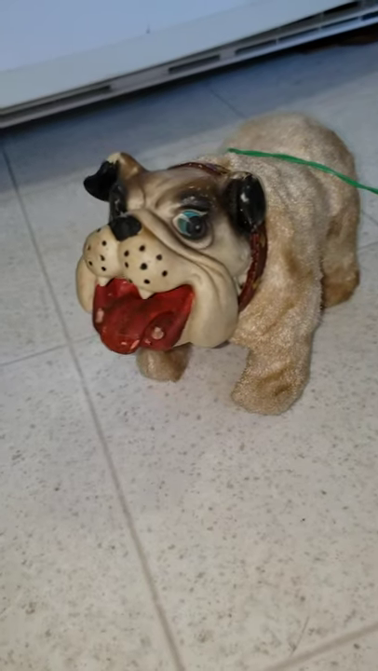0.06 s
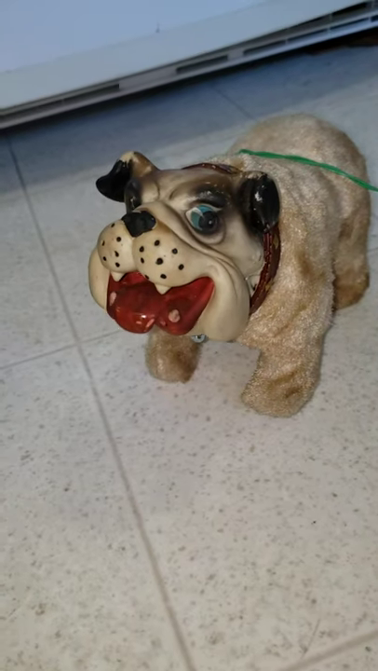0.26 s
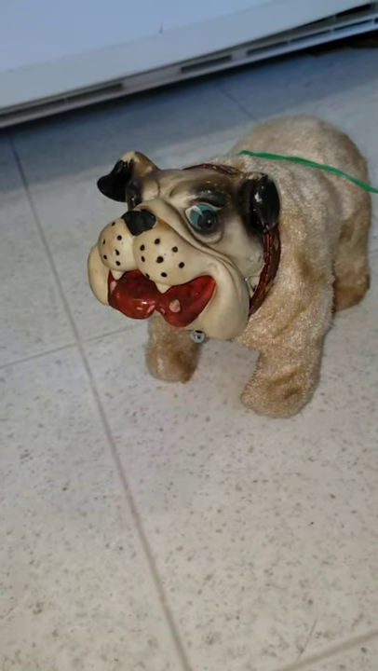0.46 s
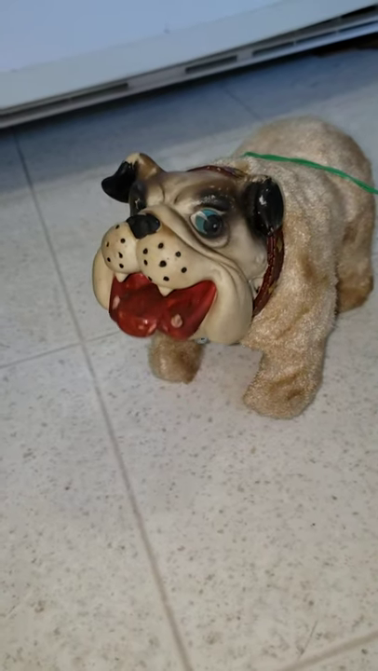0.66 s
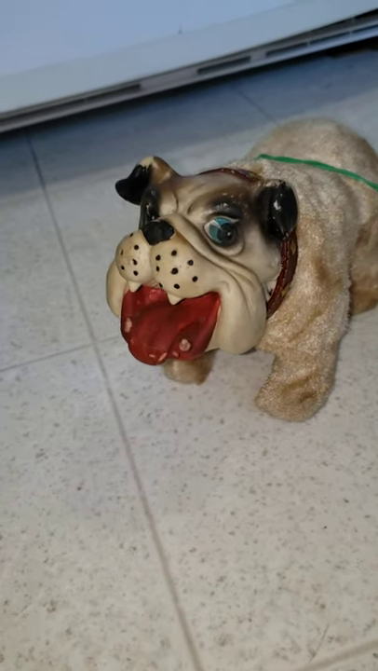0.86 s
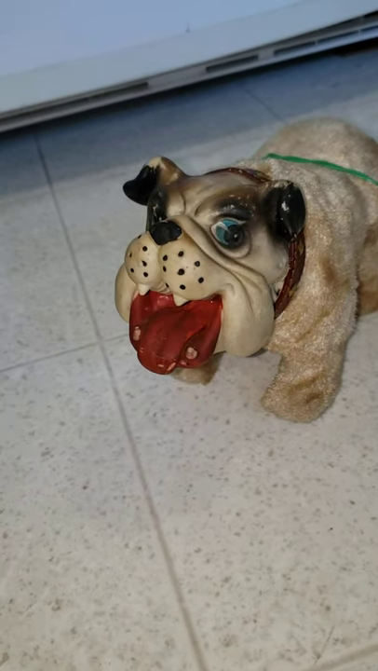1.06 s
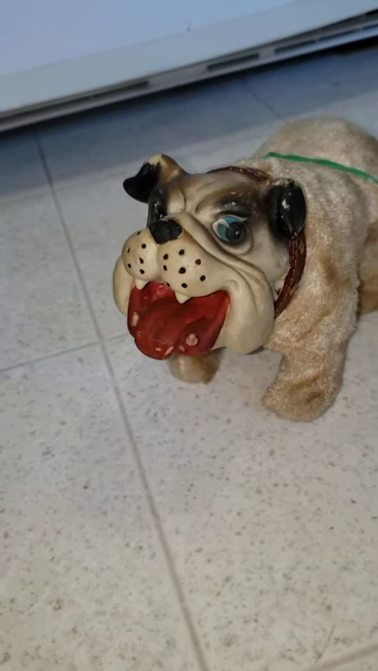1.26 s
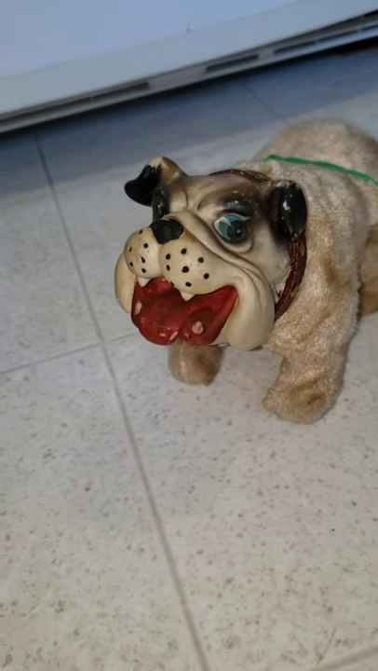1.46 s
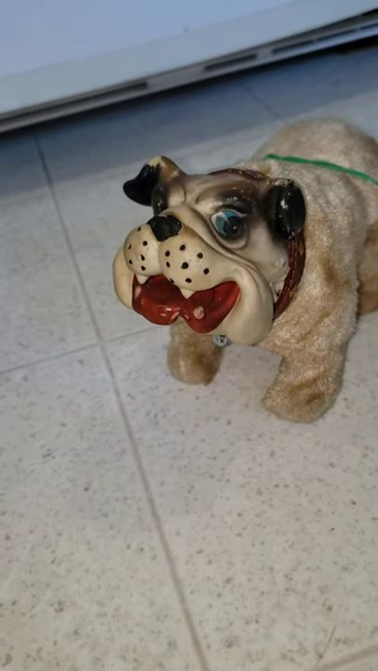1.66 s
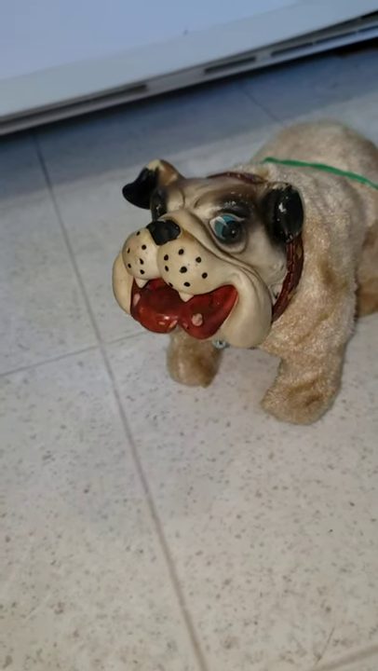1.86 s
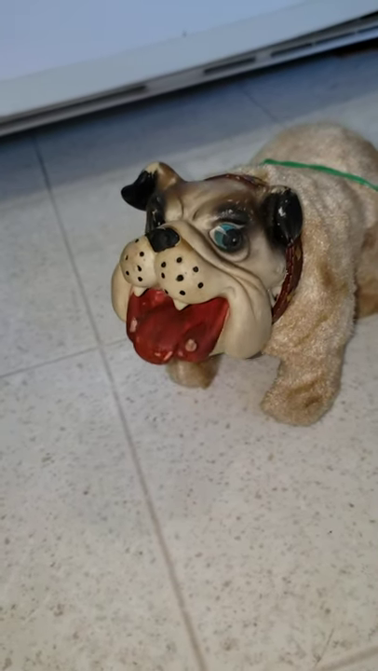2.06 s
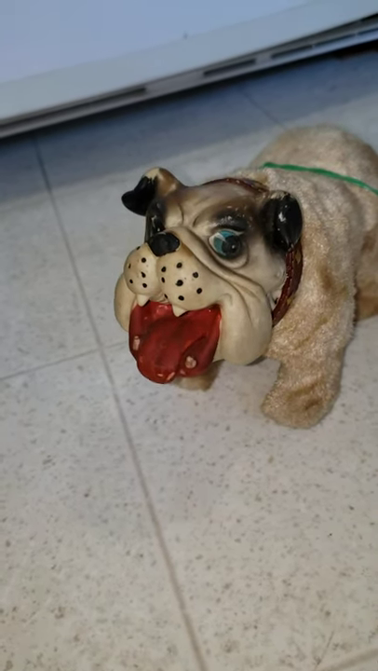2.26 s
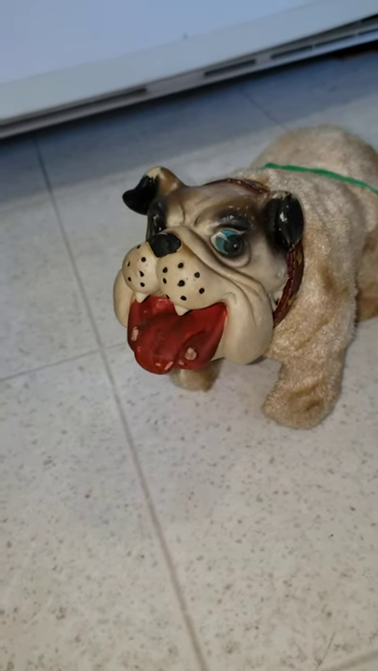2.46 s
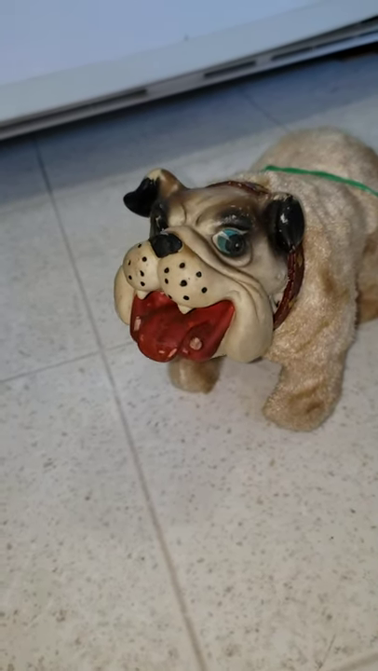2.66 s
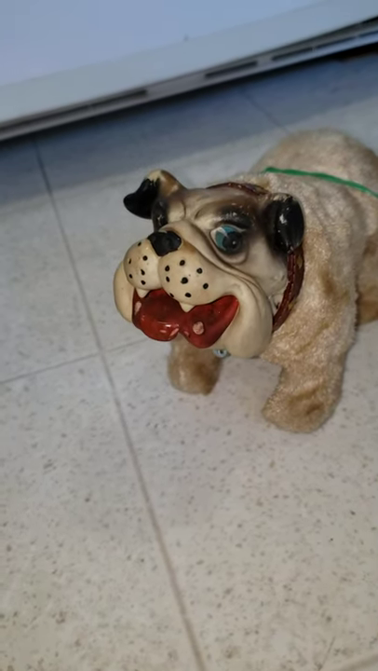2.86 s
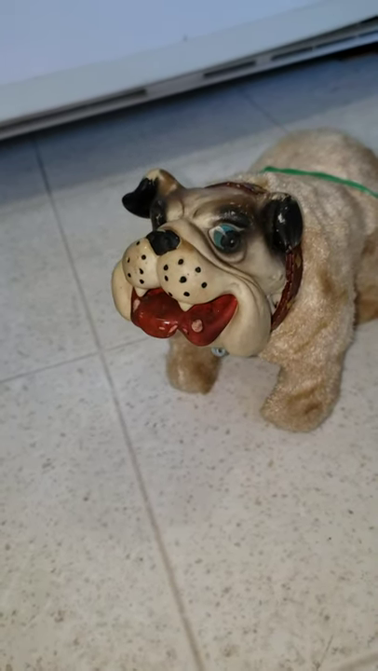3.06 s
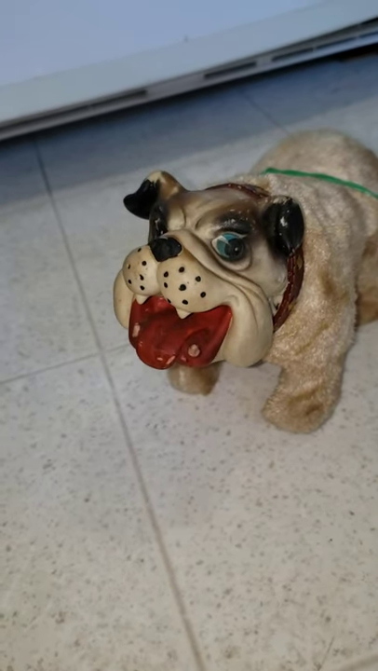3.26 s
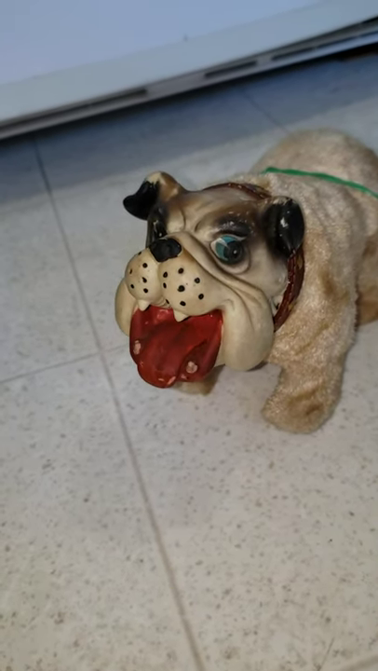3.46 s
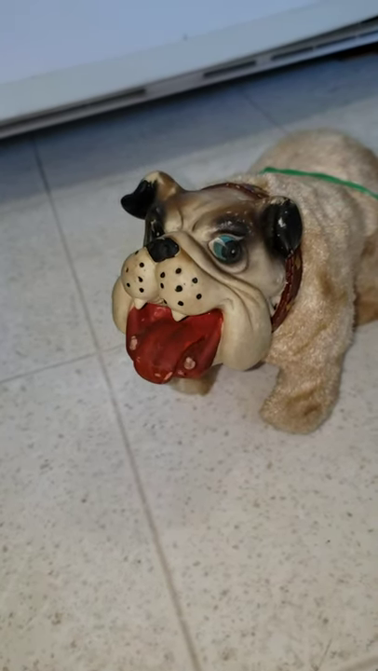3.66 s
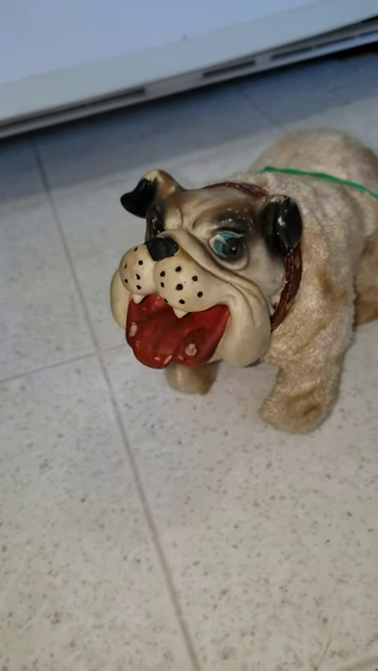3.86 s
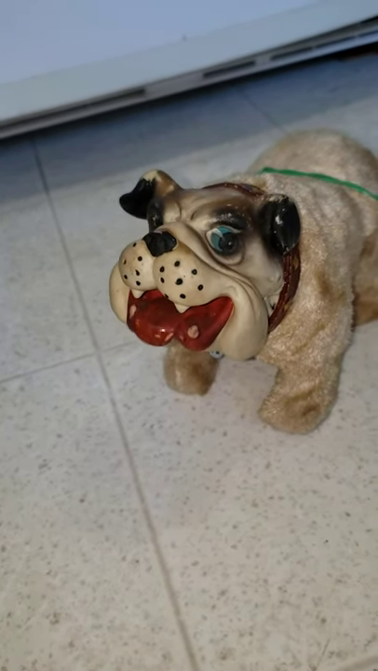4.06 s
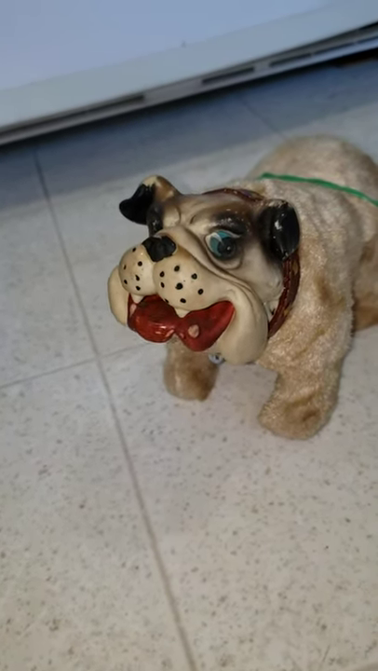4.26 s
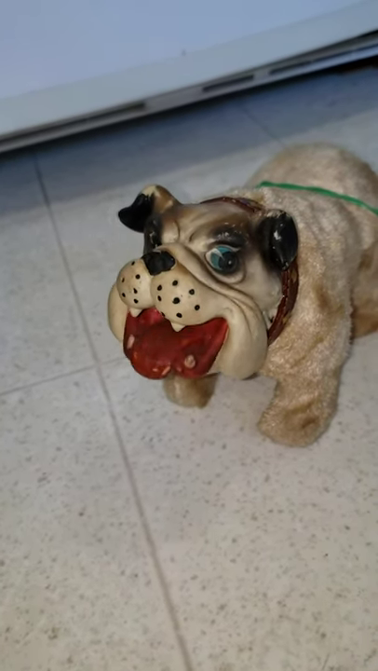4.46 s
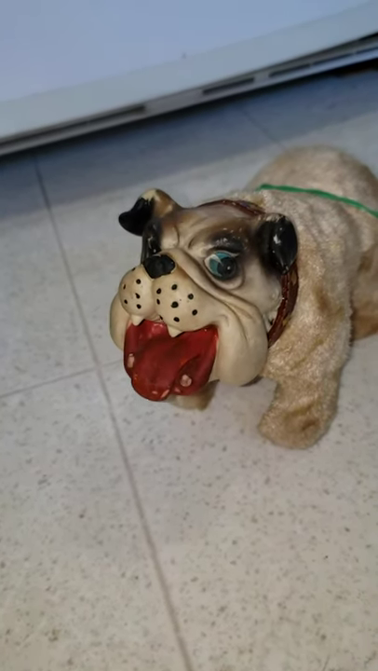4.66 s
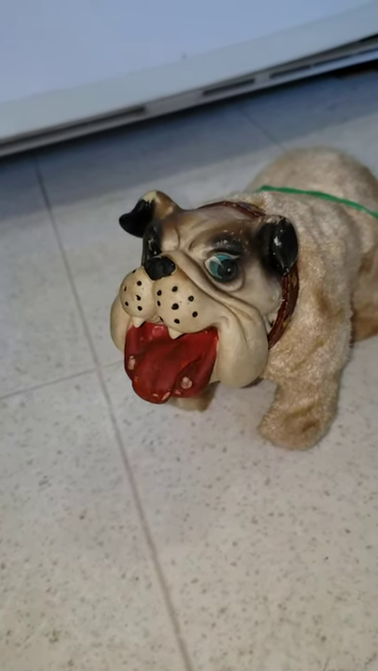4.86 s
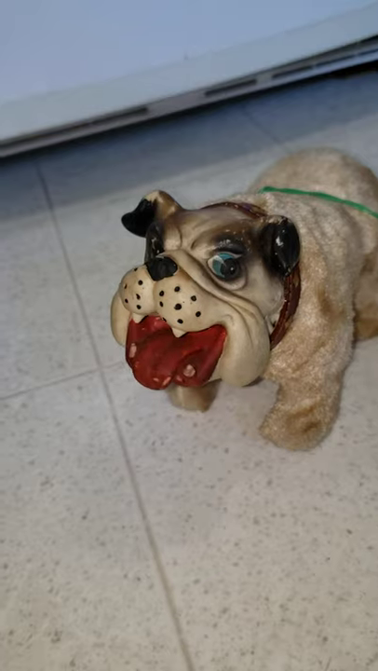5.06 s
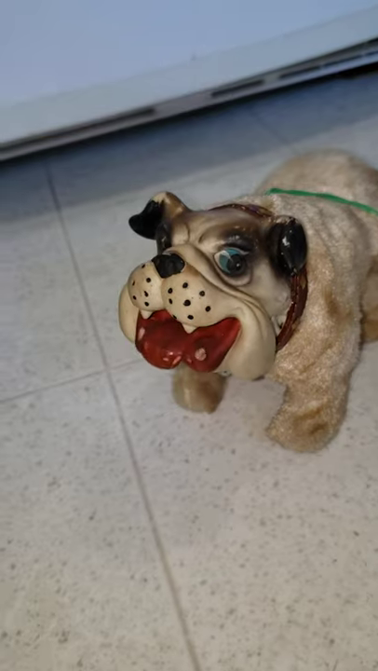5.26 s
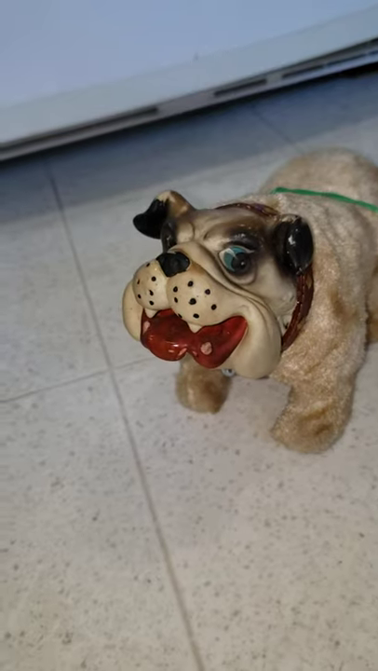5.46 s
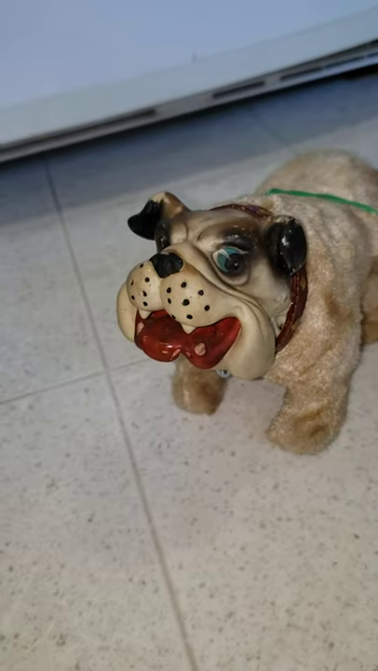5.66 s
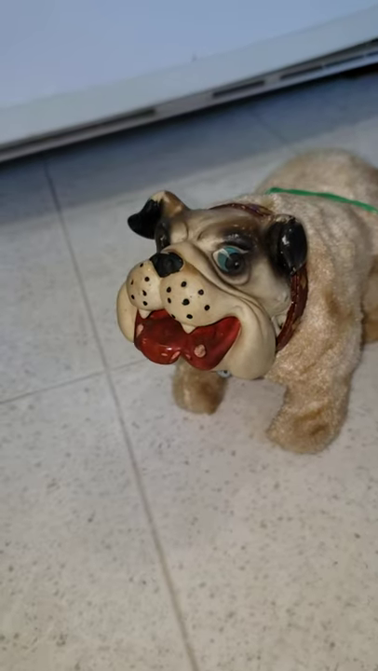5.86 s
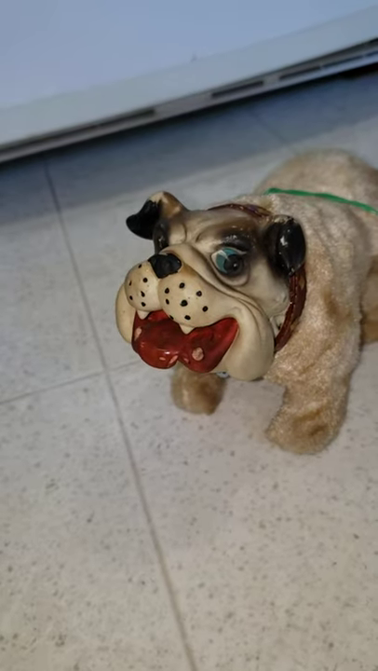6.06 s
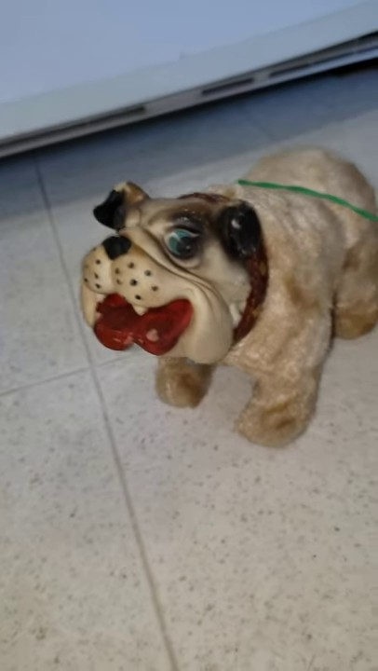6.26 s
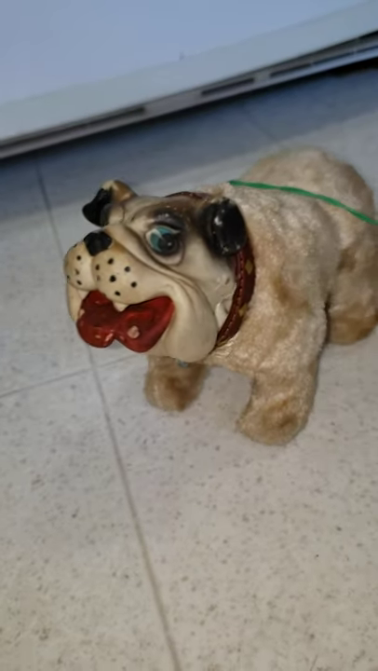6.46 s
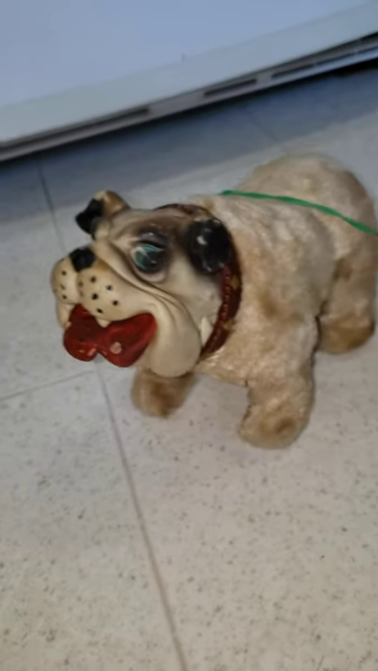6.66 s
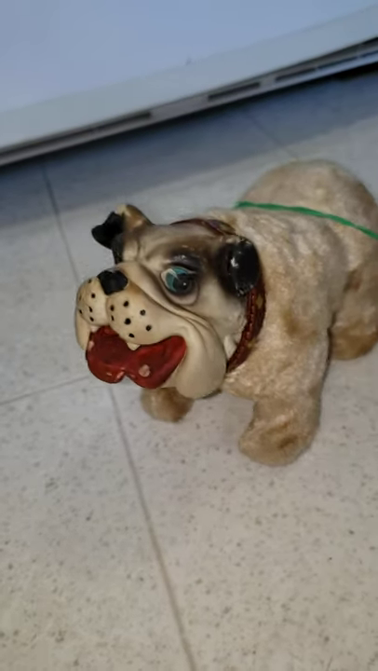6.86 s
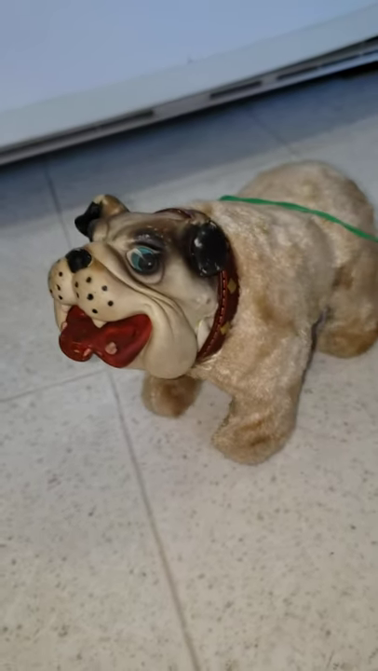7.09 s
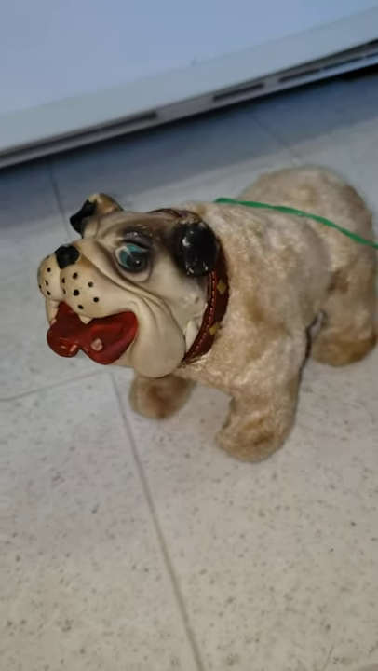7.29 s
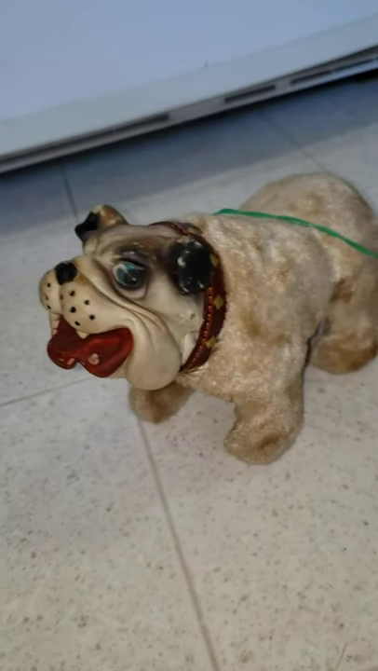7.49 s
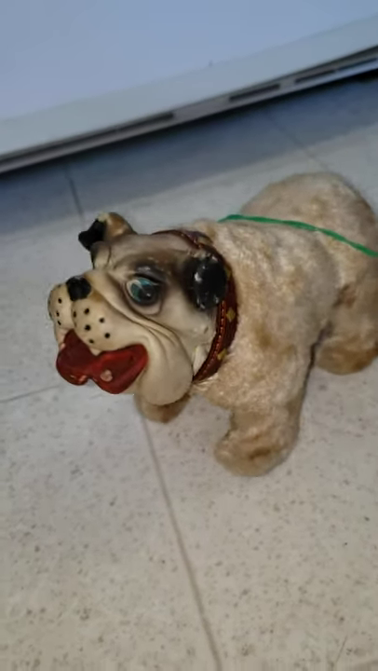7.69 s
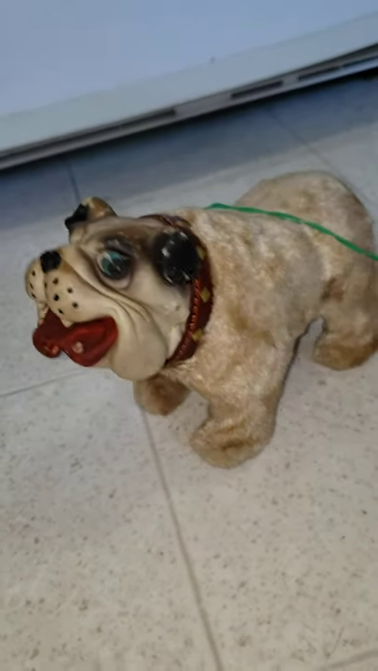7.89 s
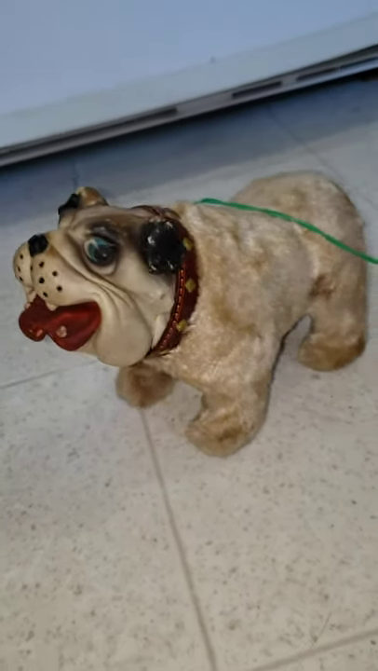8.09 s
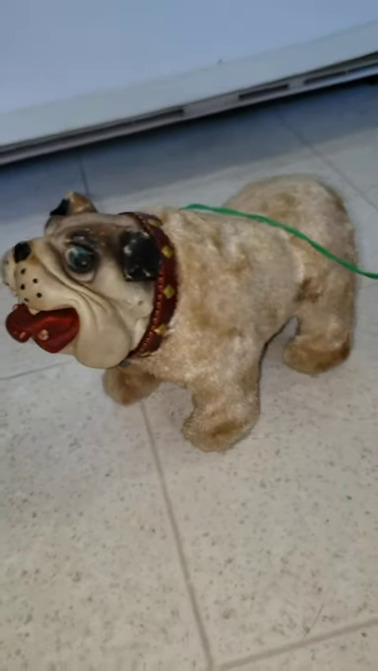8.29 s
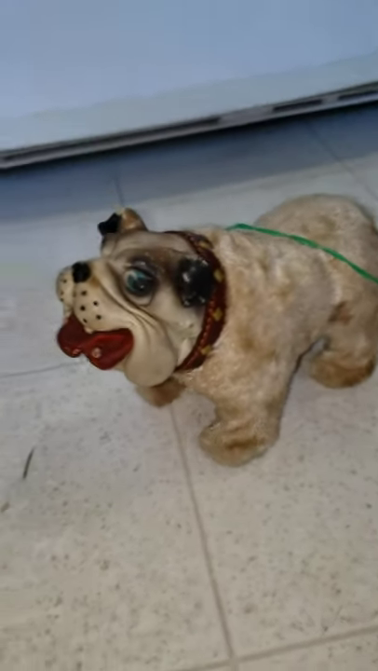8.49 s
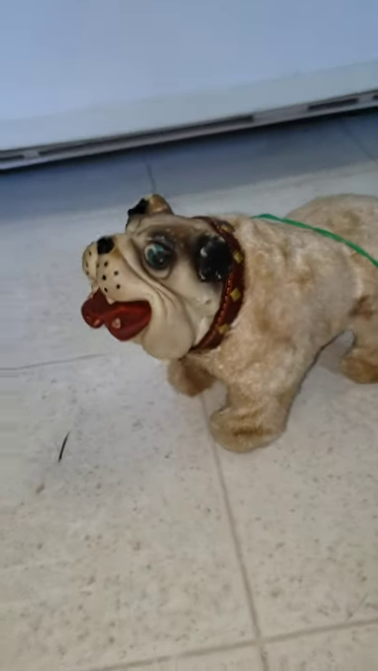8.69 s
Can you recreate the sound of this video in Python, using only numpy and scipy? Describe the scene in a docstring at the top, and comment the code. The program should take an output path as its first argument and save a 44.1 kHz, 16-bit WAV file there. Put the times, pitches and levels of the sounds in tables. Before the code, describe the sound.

A harsh, toothy rasp is already ending as the sound begins, followed by four more similar mechanical barks over continuous small-motor whir. The pitch dips with the load, then drops away to a short near-silence. A faint knock and click precede a quick restart: brighter gear noise, stepping hum, chattering loose links and sharp little clacks. Close phone microphone, stereo, small hard-floored room with a short tail.

```python
"""The end of a rasping bark, then four more, over the hum and gear whir of a toy dog on a tiled floor.
A cam presses a rasp on a toothed wheel and each tooth's snap rings a box: that is the bark.
The motor labours on every turn of the cam, then runs down; the gears knock into rest and a switch clicks.
The dog walks off on the same motor: a lighter whir, hum swelling with each step, chattering leg links
and small metallic clacks, over a quiet room tone."""
import sys
import numpy as np
from scipy import signal
from scipy.fft import rfft, irfft
from scipy.io import wavfile
from scipy.ndimage import uniform_filter1d

SR = 44100
rng = np.random.default_rng(int(sys.argv[2]) if len(sys.argv) > 2 else 0)


def to_wav(s):
    """Save 16-bit WAV."""
    ch = np.atleast_2d(s).T  # columns
    pcm = np.round(np.clip(ch, -1, 1) * 32767)  # PCM
    wavfile.write(sys.argv[1], SR, pcm.astype(np.int16))


N = 384993
T = np.arange(N) / SR

SWITCH_OFF_S, COAST_S = 5.315, 0.32  # friction brakes the shaft evenly to rest
SWITCH_ON_S, SPIN_UP_S, WALK_HZ, WALK_SAG_HZ_PER_S = 5.842, 0.1, 157.6, 1.3
TEETH_PER_TURN = 0.6  # rasp teeth per turn of the motor shaft

# One bark per turn of the cam: start_s, length_s, level_db
BARKS = [(-0.535, 0.64, -30), (0.71, 0.65, -31.5), (1.971, .66, -32), (3.217, 0.671, -32),
         (4.462, 0.65, -32)]


def bark(turns, scrape_db=-4.5, scrape_share=0.19, rebound_db=-12, rebound_lag=0.39,
         slide_radians_per_s=1.62):
    """The rasp snaps off each tooth, chatters briefly, rebounds, and rings the sounding box."""
    phase = turns * TEETH_PER_TURN
    # each bark begins with the rasp dropping onto a tooth
    for start, _, _ in BARKS[1:]:
        i = int(start * SR)
        phase = phase + (np.arange(N) >= i) * (-phase[i] % 1)
    snaps = teeth(phase, jitter=0.024, scatter_db=0.1)
    rebounds = teeth(phase - rebound_lag, jitter=0.1, scatter_db=-4.0)
    snaps = snaps + undb(rebound_db) * rebounds
    scrape = rng.standard_normal(N) * np.exp(-(phase % 1) / scrape_share)
    push = snaps / snaps.std() + undb(scrape_db) * scrape / scrape.std()
    # the contact point slides during a bark and hands over from one set of shell modes to another
    starts = np.transpose(BARKS)[0]
    since_start = T - starts[np.searchsorted(starts, T, "right") - 1]
    slide = slide_radians_per_s * since_start
    box = convolve(push * np.cos(slide), sounding_box())
    box = box + convolve(push * np.sin(slide), sounding_box())
    pressure = sum(rasp_pressure(*row) for row in BARKS)
    return pressure * unit(box, band=(800, 6500))


# The rasp lands with part of its pressure, beds in, presses a little harder, and lifts off
BARK_LANDING, BARK_ATTACK_S, BARK_SWELL_DB_PER_S, BARK_RELEASE_S = 0.59, 0.016, 2, 0.045


def rasp_pressure(start, length, db):
    """One bark: the rasp lands, holds with a slight swell, and lifts off."""
    attack = (T >= start) * (BARK_LANDING + (1 - BARK_LANDING) * rise(start, BARK_ATTACK_S))
    swell_db = BARK_SWELL_DB_PER_S * (np.clip(T - start, 0, length) - length / 2)
    return undb(db + swell_db) * attack * (1 - rise(start + length, BARK_RELEASE_S))


# Resonances of the rasp's sounding box:
# freq_hz, width_hz, relative_level_db, left_minus_right_db, likeness of the sides (-1..1)
BOX_RESONANCES = [(510, 170, -16, -1, 0.73), (733, 220, -13.5, 8.5, 0.45), (920, 200, -7, 0.5, 1),
                  (1114, 306, -2, -5.5, 0.24), (1420, 260, -3, 1, -0.8), (1570, 520, -5, -9, 0.22),
                  (2456, 144, -4, -6.5, 0.79), (2853, 240, -6, -9, -0.25), (3086, 280, -0.5, -3, -0.82),
                  (3500, 260, -10.5, -8, -0.13), (3810, 310, -5.5, -1.5, 0.54), (4560, 230, -12, 3, -0.41),
                  (4925, 420, -3.25, -7, 0.39), (5500, 320, -13, 3, 0.1), (5740, 380, -4.5, -1, 0.79),
                  (6700, 370, -7.5, -1, -0.45), (7500, 680, -8.5, -1, -0.097),
                  (10450, 1000, -14.5, 3.5, 0.28), (12100, 6500, -14.5, -3, -0.043),
                  (14930, 380, -4, -5.5, 0.5)]
# The low modes reach the left port first: freq_hz, phase_lead_radians
BOX_LEFT_LEAD = [(400, 0.072), (650, 0), (1200, 0.11), (1800, 0.88), (2300, 0)]


def sounding_box(t60=0.018, low_t60=0.031, low_hz=2200, tail_db=-20, tail_t60=0.073, build_s=0.00077):
    """Dense shell modes, grouped under broad resonances that each reach the two ports in their own way."""
    hz = np.fft.rfftfreq(SR // 3, 1 / SR) + 1
    f, width, db, pan_db, likeness = np.transpose(BOX_RESONANCES)[:, :, None]
    # resonances applied twice: steep flanks
    detune = (hz / f - f / hz) * f / (1.31 * width)
    power = (undb(db) / (1 + detune ** 2)) ** 2
    gain = np.sqrt([np.sum(power * undb(side * pan_db), axis=0) for side in (1, -1)])
    # the shell takes a moment to pick up each snap; its low modes ring on into the next one
    build = 1 - np.exp(-T[:SR // 3] / build_s)
    low = even(rfft(ring(low_t60, tail_db, tail_t60) * build))
    high = even(rfft(ring(t60, tail_db, tail_t60) * build))
    mean_likeness = np.sum(power * likeness, axis=0) / power.sum(0)
    modes = spread(np.where(hz < low_hz, low, high), mean_likeness, 0)
    lead = np.exp(1j * np.array([[1], [-1]]) * over_hz(BOX_LEFT_LEAD, hz)[0] / 2)
    return response(even(modes) * gain * lead)


FREE_HZ, FREE_RISE_HZ_PER_S = 150.13, 0.65  # unloaded shaft speed; it creeps up as the motor runs in


def shaft_speed():
    """The motor labours against the cam, coasts to rest, then spins up for the walk."""
    coast = np.clip(1 - (T - SWITCH_OFF_S) / COAST_S, 0, 1)
    barking = (FREE_HZ + FREE_RISE_HZ_PER_S * T - cam_load()) * coast
    sagging = WALK_HZ - WALK_SAG_HZ_PER_S * (T - SWITCH_ON_S)
    return np.maximum(barking + sagging * rise(SWITCH_ON_S, SPIN_UP_S), 1)


# Loads that slow the motor on every turn of the cam:
# place after the rasp lands (bark lengths), half_width (bark lengths), speed_drop_hz
CAM_DRAG = [(.36, .15, 7), (.505, .1, 17.5), (1.14, .12, 9), (1.6, .255, 21)]


def cam_load():
    """Speed in Hz that the cam takes from the motor, alike on every turn."""
    return sum(drop * np.exp(-(((T - start) / length - place) / width) ** 2)
               for start, length, _ in BARKS for place, width, drop in CAM_DRAG)


def hum(turns, hz, footing, flutter_db=3.0, pan_db=-3.0, coast_db=-1, jolt_db=2.5):
    """Rotor unbalance and three poles shake the shell; each order swells as it meets a shell mode."""
    drive = np.minimum(hz / 130, 1) ** 1.6
    walking = T > SWITCH_ON_S
    # with the current off the coasting rotor shakes less
    drive = drive * undb(coast_db * ((T > SWITCH_OFF_S) & ~walking))
    # on the walk the wobbling legs jolt the hum
    stepping = footing * undb(jolt_db * wander(32))
    standing = undb(-65.5) * shell(hz, mode_hz=153.8, width_hz=8.3, peak_db=15.5)
    shaft = drive * np.where(walking, stepping, standing)
    second = undb(-77.5) * shell(2 * hz, mode_hz=259.6, width_hz=6.5, peak_db=20.5) * drive
    poles = undb(-61.5) * shell(3 * hz, mode_hz=400.0, width_hz=10.0, peak_db=9.0) * drive
    poles = poles * shell(3 * hz, mode_hz=256.0, width_hz=13.4, peak_db=15.5)
    angle = 2 * np.pi * (turns + 0.019 * wander(40))
    lines = shaft * undb(2.0 * wander(30)) * np.sin(angle)
    for order, level in ((2, second), (3, poles)):
        lines = lines + level * undb(flutter_db * wander(35)) * np.sin(order * angle)
    return np.sqrt(2) * lines * pan(pan_db)


def shell(hz, mode_hz, width_hz, peak_db):
    """Gain of a shell mode standing above the broad response."""
    return 1 + (undb(peak_db) - 1) / np.sqrt(1 + ((hz - mode_hz) * 2 / width_hz) ** 2)


# Steps, each lasting until the next:
# start_s, share of the step at which the foot bears hardest, hum_db, link_chatter_db
FOOTSTEPS = [(6.02, 0.84, -53.5, -45), (6.43, 0.75, -50.5, -48.5), (6.885, 0.57, -52.5, -47),
             (7.06, 0.28, -54, -48.5), (7.26, 0.96, -49.5, -44.5), (7.73, 0.22, -50.5, -44),
             (8.06, 0.7, -48, -42.5), (8.53, 0.6, -50, -41.5)]
# length of the last step, shape of each swell, hum floor between steps
LAST_STEP_S, STEP_SHARPNESS, FOOT_LIFTED_DB = 0.21, 0.94, -74.5


def gait():
    """Gains of hum and link chatter: the hum swells as each foot takes the weight and dips as it lifts."""
    starts, _, _, chatter_db = np.transpose(FOOTSTEPS)
    ends = np.append(starts[1:], starts[-1] + LAST_STEP_S)
    footing = undb(FOOT_LIFTED_DB)
    for (start, share, db, _), end in zip(FOOTSTEPS, ends):
        hardest = start + min(share, 0.95) * (end - start)
        weight = np.interp(T, [start, hardest, end], [0, 1, 0])
        footing = footing + undb(db) * np.sin(weight * np.pi / 2) ** STEP_SHARPNESS
    return footing, undb(np.interp(T, (starts + ends) / 2, chatter_db))


# Colours of the gear whir, standing and on the walk: freq_hz, relative level (dB per Hz)
BARKING_COLOUR = [(250, -26.5), (620, -17), (900, -4), (1300, -8), (2050, -2.5), (3600, -4.5), (5000, -5),
                  (7000, -5), (9500, -12.5), (12000, -7.5), (15800, -7)]
WALKING_COLOUR = [(300, -56), (600, -17), (740, -7.5), (970, -3.5), (1350, -8), (2130, -4), (3960, -5),
                  (5440, -3.5), (7500, -5), (9500, -14.5), (11800, -10.5), (15800, -8)]


def whir(turns, spectrum, mesh_db, scatter_db, throb_db):
    """Loose pinion teeth rattle in the gearbox over the hiss of brushes and sliding flanks."""
    hits = teeth(turns * 8, jitter=0.5, scatter_db=scatter_db)
    gearbox = response(even(rfft(ring(t60=0.0093, tail_db=-15, tail_t60=0.066))))
    ticks = convolve(hits, gearbox)
    sound = noise() + undb(mesh_db) * ticks / ticks.std()
    # slack in the gears makes the load uneven
    sound = sound * undb(throb_db * wander(70) + 0.5 * np.sin(2 * np.pi * turns))
    return unit(colour(ports(sound), spectrum), band=(1500, 8000))


# Gear noise on the walk, growing as the dog gets into its stride: time_s, level_db
WALKING_GEAR_LEVEL = [(5.9, -46), (6.18, -45.5), (6.27, -43.5), (6.55, -44), (6.66, -43.8), (6.75, -46),
                      (6.85, -43.5), (6.98, -45.5), (7.05, -48.5), (7.12, -45.5), (7.36, -45), (7.48, -41),
                      (7.72, -41.5), (7.86, -42.5), (7.99, -43), (8.1, -41), (8.26, -41.5), (8.33, -40.5),
                      (8.5, -42.5), (8.73, -41.5)]
GEARS_ATTACK_S = 0.032  # swell of the gear noise after the switch
# standing gear noise eases as the gears run in and grows with the cam's load
GEARS_STANDING_DB, GEARS_EASE_DB_PER_S, GEARS_LOAD_DB_PER_HZ = -41, 0.24, 0.0787
RATTLE_HZ, RATTLE_STEEPNESS = 81, 3  # below this shaft speed the rattle dies steeply


def gear_levels(hz, slack_db=-3.5, slack_lead_s=0.05, slack_width_s=0.043):
    """Gains of the gear noise while the dog stands and while it walks."""
    # the gears run slack and quieter just before the cam engages the rasp
    slack = sum(np.exp(-((T - start + slack_lead_s) / slack_width_s) ** 2) for start, _, _ in BARKS[1:])
    standing_db = GEARS_STANDING_DB - GEARS_EASE_DB_PER_S * T
    standing_db = standing_db + GEARS_LOAD_DB_PER_HZ * cam_load() + slack_db * slack
    standing = undb(standing_db) / np.hypot(1, (RATTLE_HZ / hz) ** RATTLE_STEEPNESS)
    walking = undb(np.interp(T, *np.transpose(WALKING_GEAR_LEVEL))) * rise(SWITCH_ON_S, GEARS_ATTACK_S)
    return standing * (T < SWITCH_ON_S), walking


def soften(x, hz, bright_hz=84, steepness=6, dull_db=-20):
    """Slow teeth meet softly: the gear noise loses its treble first as the shaft runs down."""
    dull = colour(x, [(5000, 0.0041), (9000, dull_db)])
    return dull + (x - dull) / np.hypot(1, (bright_hz / hz) ** steepness)


# Metal ring of the leg links: freq_hz, relative level (dB per Hz)
LINK_COLOUR = [(2000, -25), (9500, -18.5), (12000, -10), (13200, 0), (13750, -0.5), (14300, 4), (14700, -1),
               (15600, -3.5), (17000, -13)]
# Fits in which one leg link buzzes against its pin: middle_s, half_width_s, pitch_hz, level_db
LINK_BUZZES = [(6.3, .09, 14100, -57), (6.8, .07, 14040, -49), (7.08, 0.087, 13970, -41),
               (7.66, 0.097, 13850, -48), (7.861, 0.12, 13830, -42), (8.16, 0.045, 13550, -48),
               (8.425, .025, 14200, -42), (8.68, 0.055, 13700, -48)]


def links(turns, loose, pan_db=-6.0, width_hz=950, flicker_db=7.0):
    """Loose metal leg links chatter with a high, broken hiss; now and then one of them rings out."""
    taps = teeth(turns * 3, jitter=0.4, scatter_db=4.0) * undb(2 * wander(70))
    metal = convolve(taps, response(even(rfft(ring(t60=0.011, tail_db=-17, tail_t60=0.11)))))
    sound = loose * unit(colour(metal, LINK_COLOUR), band=(13300, 14600))
    flicker = undb(flicker_db * wander(45))
    for middle, half_width, hz, db in LINK_BUZZES:
        b, a = signal.iirpeak(hz, hz / width_hz, fs=SR)
        near = np.abs(T - middle) < 3 * half_width
        buzz = signal.lfilter(b, a, signal.lfilter(b, a, metal[:, near])) * flicker[near]
        swell = np.exp(-((T[near] - middle) / half_width) ** 2)
        sound[:, near] += undb(db) * swell * buzz / buzz.mean(0).std()
    return sound * pan(pan_db)


# Clacks of the links and legs: time_s, metal_ring_peak_db (before panning), body_knock_peak_db
LEG_CLACKS = [(4.968, -14, -32), (6.101, -24, -21.5), (6.1415, -31, -40), (6.2698, -29, -23),
              (6.6311, -25, -35), (6.818, -23, -26), (6.8524, -22, -32), (6.962, -21, -24),
              (7.0899, -19, -24.5), (7.467, -21, -28), (7.522, -18, -25), (7.5847, -28, -28),
              (7.629, -23, -29), (7.6525, -15.5, -24), (7.7149, -16, -22.5), (7.7658, -21, -37),
              (7.8072, -20, -33), (7.8785, -22, -33), (7.9115, -28, -42), (8.0033, -24, -36),
              (8.0707, -15, -23), (8.1369, -19, -28), (8.2154, -35, -24), (8.4034, -15, -26)]
# The switch clicks, bounces and closes: time_s, metal_ring_peak_db (before panning), body_knock_peak_db
SWITCH_CLICKS = [(5.823, -45, -45), (5.835, -54, -50), (5.842, -42, -41)]
# Colour of the body's knock: freq_hz, relative level (dB per Hz)
KNOCK_COLOUR = [(100, -6), (250, -6), (1200, 2.5), (2300, 4.5), (4000, 0.5), (5500, 8), (7500, 5),
                (10000, -6), (16000, -26)]


def clacks(rows, t60, tail_db, pan_db):
    """Each blow rings the metal and knocks the body."""
    out = np.zeros((2, N + SR))
    for start, metal_db, knock_db in rows:
        metal = colour(ring(t60, tail_db, tail_t60=0.13), LINK_COLOUR)[:, :SR // 5]
        knock = colour(ports(ring(2.2 * t60, tail_db - 5, tail_t60=0.13)), KNOCK_COLOUR)[:, :SR // 5]
        metal = metal / np.abs(metal).max() * pan(pan_db)
        knock = knock / np.abs(knock).max()
        i = int(start * SR)
        out[:, i:i + SR // 5] += undb(metal_db) * metal + undb(knock_db) * knock
    return out[:, :N]


# Gearbox modes rung by the settling gears: pitch_hz, relative_level_db, t60_s
SETTLE_MODES = [(1970, 4, .025), (2280, 5, 0.053), (2480, -9, .08), (2880, 3, 0.036), (5330, 2, .03),
                (5520, -17, .05)]
SETTLE_S, SETTLE_DB = 5.719, -52.5  # time and peak level before panning


def settle(pan_db=-3, contact_s=0.00048, crack_db=1, crack_s=0.0016):
    """The stopped gear train drops back through its slack and knocks the gearbox."""
    t = T[:SR // 5]
    knock = sum(undb(db - 60 * t / t60) * np.sin(2 * np.pi * (hz * t + rng.random()))
                for hz, db, t60 in SETTLE_MODES)
    crack = colour(rng.standard_normal(len(t)), [(800, -6), (2000, 13), (5500, 6), (9000, -12)])
    crack = crack * np.exp(-t / crack_s)
    knock = knock + undb(crack_db) * crack / crack.std() / 10
    knock = knock * (1 - np.exp(-t / contact_s))
    knock = np.interp(T - SETTLE_S, t, knock / np.abs(knock).max(), left=0, right=0)
    return knock * undb(SETTLE_DB) * pan(pan_db)


# The gears grind under the starting torque: freq_hz, relative level (dB per Hz)
GRIND_COLOUR = [(120, -26), (400, 1), (900, 2), (1800, 7), (3000, -19), (8000, -20), (16000, -8)]
GRIND_ATTACK_S, GRIND_DB = 0.008, -49  # bites sooner than the gear noise


def start_grind():
    """Coloured noise bites at the start of the walk and fades as the motor gains speed."""
    swell = rise(SWITCH_ON_S, GRIND_ATTACK_S) * (1 - rise(SWITCH_ON_S, 2 * SPIN_UP_S))
    return swell * murmur(GRIND_COLOUR, db=GRIND_DB)


# Low rumble that follows the gear noise: freq_hz, relative level (dB per Hz)
RUMBLE_COLOUR = [(20, -32), (45, -13), (68, -7.5), (100, -10.5), (150, -11), (185, 4.5), (225, -6.5),
                 (262, 1), (310, -5.5), (450, 2), (580, -5.5), (1000, -9), (3000, -68)]
# Feet shuffling on the tiles: freq_hz, relative level (dB per Hz)
SHUFFLE_COLOUR = [(20, -24), (60, 0), (100, -7), (200, -7), (1000, -60)]


def rumble(standing, walking, legs):
    """Low noise rises and falls with the gears; on the walk the shuffle of the feet joins it."""
    still = standing * murmur(RUMBLE_COLOUR, db=-13.0)
    shuffle = legs * murmur(SHUFFLE_COLOUR, db=-20.5)
    return still + walking * (murmur(RUMBLE_COLOUR, db=-11.5) + shuffle)


ROOM_T60_S, ROOM_DB = 0.35, -9.5


def room(x):
    """Floor and cupboards return a short diffuse tail; the deep hum stays direct."""
    t = T[:SR // 2]
    tail = colour(rng.standard_normal((2, len(t))), [(200, -53), (700, 6.5), (6000, -1.5), (16000, -2.5)])
    tail = tail * undb(-60 * t / ROOM_T60_S) * (t > 0.004)
    return x + undb(ROOM_DB) * convolve(x, tail / np.sqrt(np.sum(tail ** 2) / 2))


# Colour of the quiet room: freq_hz, relative level (dB per Hz)
ROOM_COLOUR = [(24, -55), (40, -17), (114, 0), (166, -17.5), (303, 4), (371, -10.5), (766, -15),
               (1430, -30), (2190, 4), (3610, -13), (5390, -11.5), (6420, -25.5), (15800, -22)]


def room_tone():
    """Steady coloured noise lies under everything."""
    return murmur(ROOM_COLOUR, db=-77.5)


def murmur(spectrum, db):
    """Soft coloured noise at a given rms level."""
    x = colour(ports(noise()), spectrum)
    return x / x.mean(0).std() * undb(db)


# How sound reaches the two ports: freq_hz, likeness (-1..1), left_minus_right_db
PORT_PATHS = [(100, 0.87, -3), (475, 0.9, -3), (682, 0.48, 6), (950, 1, -1.5), (1290, -0.5, -3.5),
              (1980, 0.13, -4.5), (3620, -0.34, -2.5), (5040, 0.12, -5), (6570, -0.1, -1),
              (10200, -0.025, -1), (11900, 0.15, -7.5), (15500, -0.092, -2)]


def ports(pair):
    """Place two unrelated signals where the toy stands."""
    n = pair.shape[-1]
    return irfft(spread(rfft(pair), *over_hz(PORT_PATHS, np.fft.rfftfreq(n, 1 / SR))), n)


def spread(pair, likeness, pan_db):
    """Two unrelated spectra become left and right of a given likeness and balance."""
    c, side = np.clip(likeness, -0.99, 0.99), np.array([[1], [-1]])
    return (np.sqrt(1 + c) * pair[0] + side * np.sqrt(1 - c) * pair[1]) * undb(side * pan_db / 2)


def pan(db):
    """Left and right gains for a left-minus-right balance."""
    return undb(np.array([[db], [-db]]) / 2)


def teeth(phase, jitter, scatter_db):
    """One click a tooth, each a little early or late and of its own strength."""
    chance = rng.standard_normal((N // 20, 2))[:int(phase[-1])]
    at = np.searchsorted(phase, np.arange(len(chance)) + jitter * chance[:, 0])
    return np.bincount(at, undb(scatter_db * chance[:, 1]), N + 1)[:N]


def ring(t60, tail_db, tail_t60):
    """Dense modes, two unrelated sets: a quick decay and a weak long one."""
    t = T[:SR // 3]
    decay = undb(-60 * t / t60) + undb(tail_db - 60 * t / tail_t60)
    return rng.standard_normal((2, len(t))) * decay


def even(spectra):
    """Give every 140 Hz of a dense ring the same power, so that only its fine ripple stays."""
    power = uniform_filter1d(uniform_filter1d(np.abs(spectra) ** 2, size=47), size=47)
    return spectra / np.sqrt(power)


def response(spectra):
    """Back to time, with a 2 ms lead-in."""
    return np.roll(irfft(spectra), SR // 500, axis=1)[:, :SR // 4]


def convolve(x, impulse):
    """Pass x through a left and a right response."""
    return signal.fftconvolve(np.atleast_2d(x), impulse, axes=1)[:, :N]


def colour(x, points):
    """Give x a spectrum."""
    n = x.shape[-1]
    return irfft(rfft(x) * undb(over_hz(points, np.fft.rfftfreq(n, 1 / SR))[0]), n)


def over_hz(points, hz):
    """The columns of a table, joined on a log-frequency axis."""
    f, *columns = np.transpose(points)
    return [np.interp(np.log(hz + 1), np.log(f + 1), c) for c in columns]


def unit(x, band):
    """Scale to rms 1 within a band, midway between the ports."""
    sos = signal.butter(4, band, "bandpass", fs=SR, output="sos")
    return x / signal.sosfilt(sos, x.mean(0)).std()


def noise():
    """Two unrelated white noises."""
    return rng.standard_normal((2, N))


def wander(rate_hz):
    """Smooth chance with a spread near 1."""
    return 1.2 * np.interp(T * rate_hz, np.arange(N // 10), rng.standard_normal(N // 10))


def rise(start, seconds):
    """0 until the start, then settling towards 1."""
    return 1 - np.exp(-np.maximum(T - start, 0) / seconds)


def undb(db):
    """Decibels to gain."""
    return 10 ** (np.asarray(db) / 20)


def scene():
    """One motor shaft drives hum, gears, rasp and legs."""
    hz = shaft_speed()
    turns = np.cumsum(hz) / SR
    standing, walking = gear_levels(hz)
    footing, link_gain = gait()
    # the links only chatter near full speed, and in fits
    legs = (T > SWITCH_ON_S) * (hz / WALK_HZ) ** 10
    chatter = legs * links(turns, link_gain * undb(3 * wander(25)))
    still_whir = whir(turns, BARKING_COLOUR, mesh_db=-5.5, scatter_db=-3.5, throb_db=1.0)
    walking_whir = whir(turns, WALKING_COLOUR, mesh_db=-1.5, scatter_db=5.0, throb_db=1.6)
    gears = standing * soften(still_whir, hz) + walking * walking_whir
    hits = clacks(LEG_CLACKS, t60=0.033, tail_db=-15, pan_db=-6.5)
    hits = hits + clacks(SWITCH_CLICKS, t60=0.0054, tail_db=-26, pan_db=-2) + settle()
    toy = bark(turns) + hum(turns, hz, footing) + gears + chatter + hits
    toy = toy + start_grind() + rumble(standing, walking, legs)
    return room(toy) + room_tone()


def record(dry):
    """The phone cuts the top above 15.75 kHz with a steep low-pass."""
    return signal.sosfilt(signal.ellip(12, 0.1, 80, 15750, fs=SR, output="sos"), dry)


dry = scene()
out = record(dry)
to_wav(out)
```